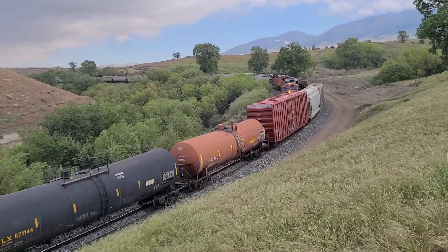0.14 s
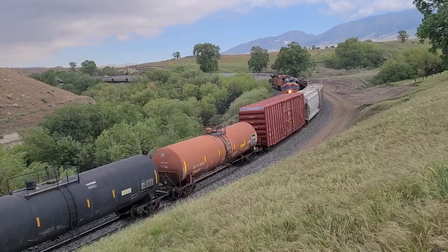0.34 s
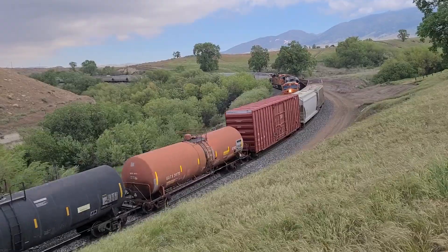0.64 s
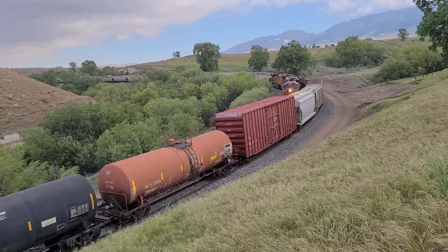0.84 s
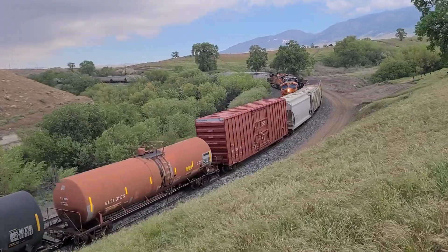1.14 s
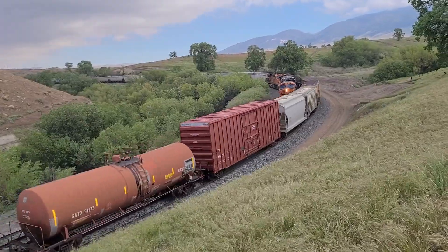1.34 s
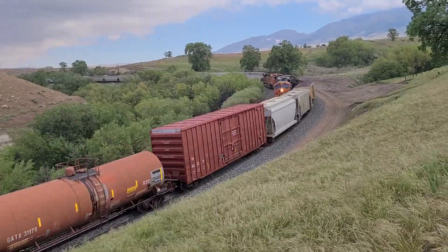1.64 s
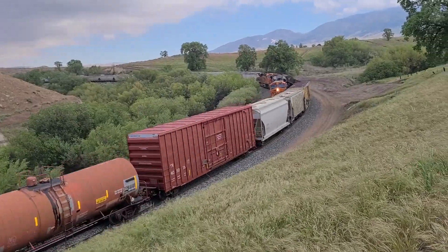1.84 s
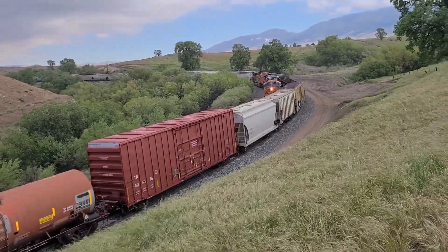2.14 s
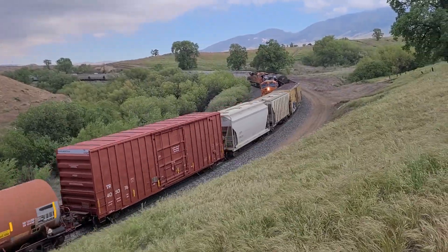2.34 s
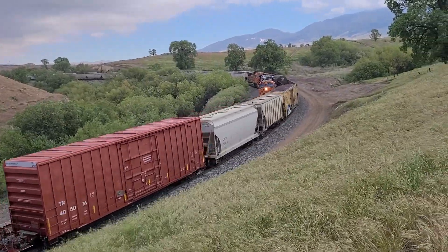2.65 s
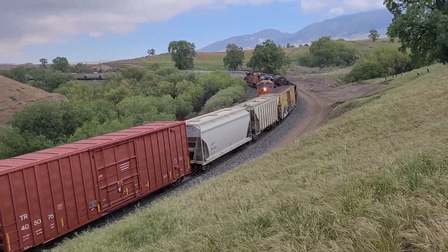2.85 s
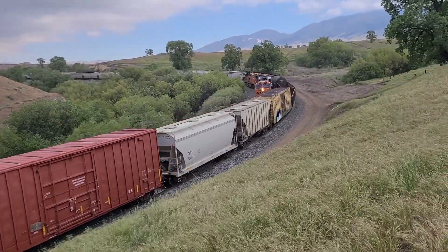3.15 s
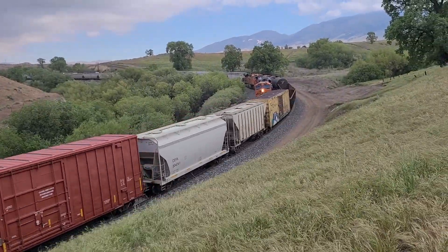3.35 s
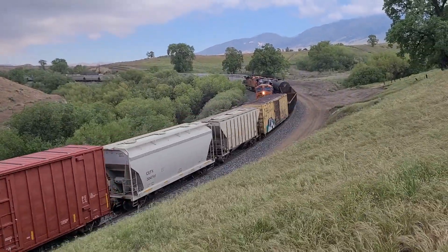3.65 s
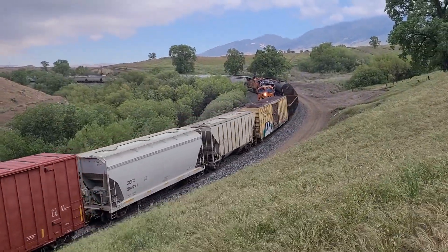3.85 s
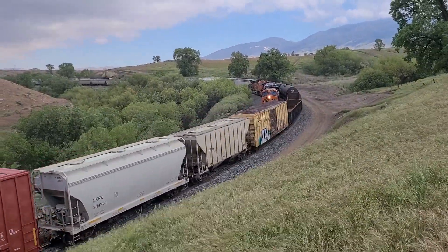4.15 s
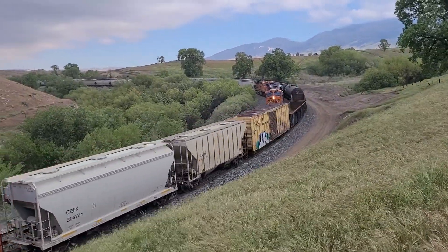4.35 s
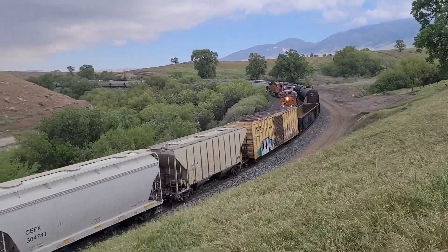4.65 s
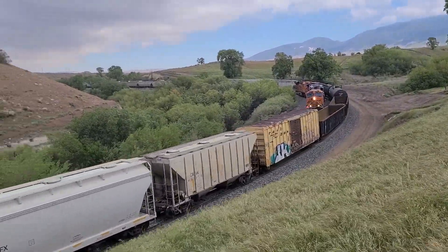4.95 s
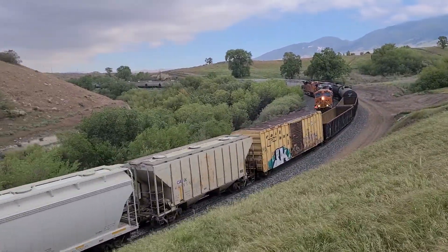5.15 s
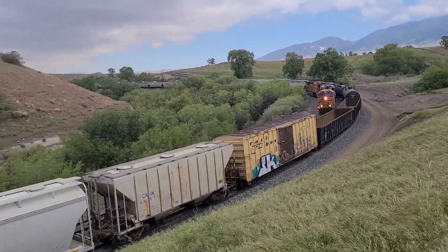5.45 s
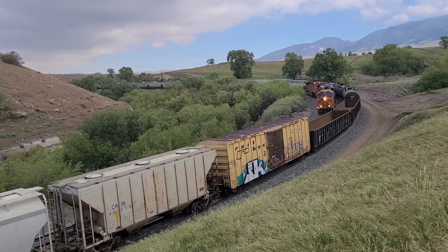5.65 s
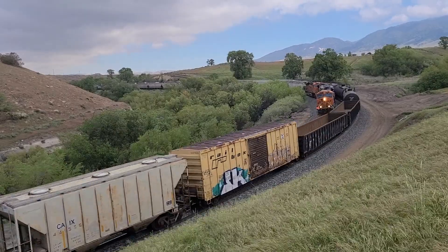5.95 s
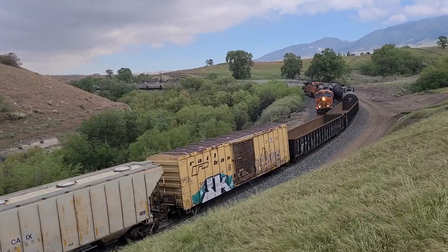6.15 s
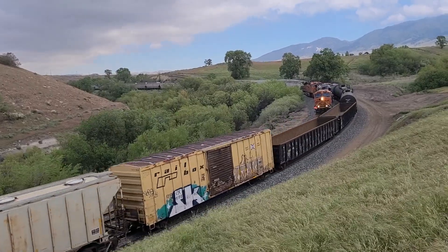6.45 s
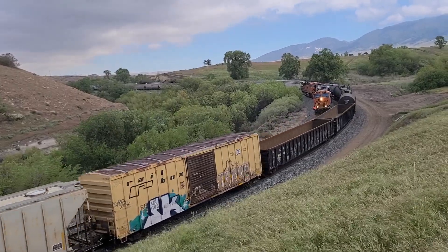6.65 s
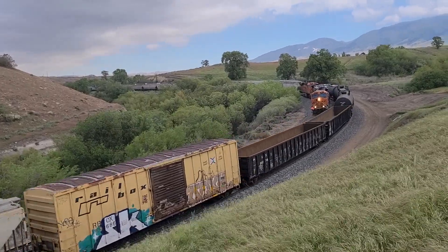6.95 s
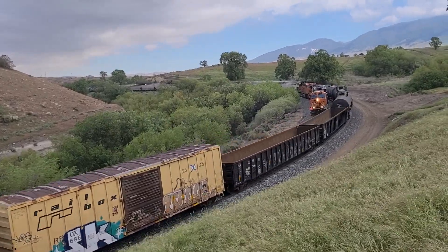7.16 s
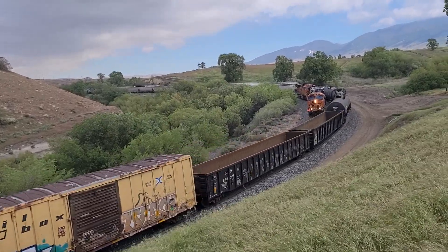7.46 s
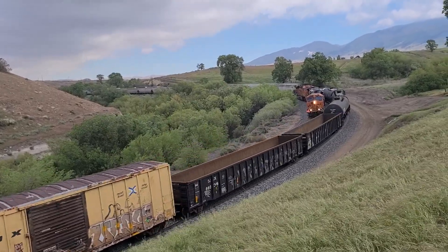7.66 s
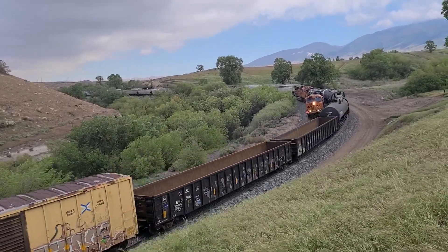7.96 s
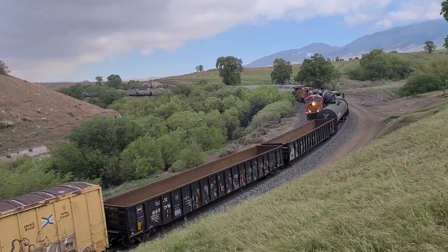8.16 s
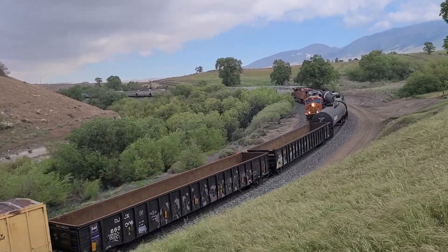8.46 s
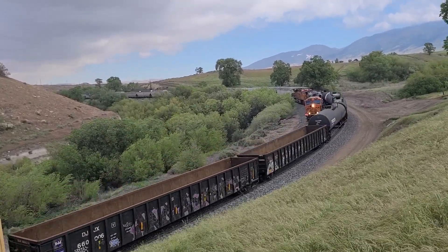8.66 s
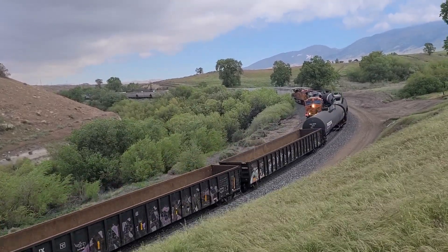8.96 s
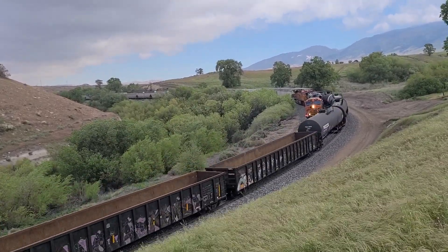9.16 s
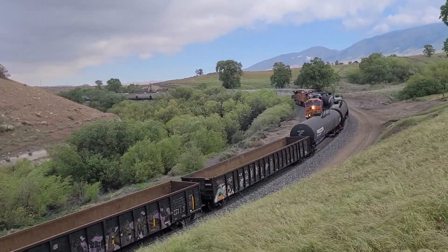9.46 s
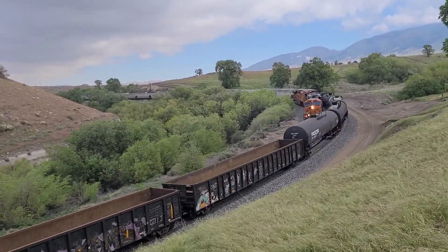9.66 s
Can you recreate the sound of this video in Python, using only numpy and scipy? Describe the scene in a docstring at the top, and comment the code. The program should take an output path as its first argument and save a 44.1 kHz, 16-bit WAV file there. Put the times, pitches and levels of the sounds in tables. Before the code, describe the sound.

High wavering wheel squeals, short yelps and a harsh shriek ride above hissing flanges and the low rumble of passing freight cars.

```python
"""First a high wheel whistle and a chatter are heard over a low rumble: a freight train in a tight curve.
Stick-slip across the rail locks wheels onto their own modes: wavering tones squeal, yelp and shriek.
Flange and tread friction, as noise shaped by resonances, grinds, hisses, rasps and roars.
Below, noise-driven cars rumble and boom, a body drones on one low tone and decaying knocks thump.
A grassy slope scatters a thin tail of the yelps, shrieks and bites back to the hillside."""
import sys
import numpy as np
from scipy import signal
from scipy.fft import irfft
from scipy.io import wavfile
from scipy.ndimage import uniform_filter1d

SR = 44100
rng = np.random.default_rng(int(sys.argv[2]) if len(sys.argv) > 2 else 0)


def master_out(mix):
    """Clip the mix to full scale and print it as 16-bit PCM to the path in sys.argv[1]."""
    frames = np.transpose(np.atleast_2d(mix))
    ceiling = np.clip(frames, -1, 1)
    pcm = np.round(ceiling * 32767).astype(np.int16)
    wavfile.write(sys.argv[1], SR, pcm)


N = 432180
TIME = np.arange(N) / SR  # s
FREQS = np.maximum(np.arange(N // 2 + 1) * SR / N, 1)  # Hz
TOP_HZ = 15750  # upper edge of the sound

# Levels of tones are those of the unscattered line.
# Main squeal held by slipping wheels:
# (start [s], length [s], pitch midway [Hz], level [dB], scattered share of amplitude [0-1])
SQUEALS = [(-.1, 1.5, 3570, -37, 0.55), (0.326, 0.33, 3546, -27, 0.3), (0.652, 0.24, 3565, -24, 0.52),
           (3.033, 0.26, 3615, -35, 0.6), (3.622, 0.46, 3610, -36.5, 0.65), (3.927, 1.41, 3608, -32, 0.58),
           (4.684, 0.28, 3620, -25, 0), (5.418, 0.34, 3600, -40, 0.63), (5.599, 0.35, 3600, -27.5, 0.25),
           (5.853, 0.37, 3607, -21, 0.21)]
SQUEAL_ATTACK_S, SQUEAL_RELEASE_S = 0.069, 0.15
SAG_PER_S = 0.0078  # share of its pitch that a passing wheel loses each second
STUTTER_DB, STUTTER_PER_S = 6, 55  # depth and rate of the uneven grip of a slipping wheel

# Sinking note of the last wheel: (time [s], pitch [Hz])
GLIDE = [(6.1, 3600), (7.25, 3556), (8.3, 3506), (9.8, 3454)]
# How loudly the last wheel slips: (time [s], level [dB])
SLIP = [(6.12, -37.5), (6.9, -36), (7.35, -28.5), (8.38, -28.5), (8.68, -42), (9.15, -31), (9.8, -37.5)]
# Moments when the last wheel locks onto a purer tone: (start [s], length [s], level [dB])
LOCKS = [(6.76, .05, -27), (7.04, .1, -31), (7.195, .055, -25.5), (7.585, .065, -19), (7.75, .13, -24),
         (8.132, 0.074, -19.5), (8.26, .17, -20.5), (8.435, .075, -22), (8.73, .27, -27), (9.21, .095, -22)]
LOCK_EDGE_S, CORE_SHARE = 0.013, 1.08  # attack of a lock; gain of the slip level in the firm core

# Spells of one wheel whistling in a higher mode: (start [s], length [s], level [dB])
WHISTLES = [(-.1, 0.44, -21.5), (.28, 0.21, -30.5), (0.448, 0.21, -26), (0.598, 0.37, -35.5),
            (0.903, 1.08, -44.5), (1.923, 0.32, -38)]
WHISTLE_HZ = 7140  # at time zero
# Spells of a wheel chattering without locking: (start [s], length [s], level [dB])
CHATTERS = [(-.1, 0.56, -27), (.39, 0.33, -25), (.72, .29, -24), (.95, 0.64, -34)]

# Short squeals of single wheels:
# (start [s], length [s], pitch midway [Hz], level [dB], octave relative to the tone [dB])
YELPS = [(0.026, 0.37, 10660, -36, -80), (0.869, 0.76, 1246, -31, -12), (0.845, 0.15, 12400, -32, -81),
         (1.531, 0.17, 2040, -24.5, -40), (1.599, 0.14, 1975, -28, -40), (2.024, 0.24, 1270, -35.5, -6),
         (2.533, 0.25, 1287, -28, -10), (2.65, 0.16, 13600, -31, -90), (2.729, 0.43, 994, -36, -23),
         (3.399, 0.092, 1285, -22.5, -12.5), (3.484, .065, 1270, -16, -20), (3.49, 0.28, 1283, -29.5, -24),
         (3.898, 0.6, 1284, -28.5, -18), (3.995, 0.13, 1267, -19, -18), (4.245, 0.083, 1260, -21, -13),
         (4.312, 0.085, 1265, -23, -21), (5.873, 0.022, 2440, -18, -22), (7.53, 0.366, 8620, -40.5, -80)]

# A flange jams and several modes shriek together:
# (start [s], length [s], level of the modes [dB], scrape before its attack and decay [dB])
SHRIEKS = [(5.226, 0.17, -18.5, -18), (5.814, .14, -28.5, -25.5)]
# Modes of a shriek, which take hold in turn: (frequency before bending [Hz], relative level [dB],
# begin [share of the shriek], end [share of the shriek], depth of beating [0-1])
SHRIEK_MODES = [(1253, 1, 0.12, 0.96, 0.074), (1880, 2, 0.181, 0.43, .1), (2460, -3, .06, 0.85, 0.97),
                (3040, -11, .3, 0.44, .6), (4810, -11, .5, 0.67, 0.27), (6910, -15.5, 0.29, 1, 0.51),
                (7940, -16, 0.48, 0.94, 0.47)]
# Spectrum of the gritty scrape: (frequency [Hz], relative density [dB per Hz])
SCRAPE = [(900, -22), (1450, -3), (1870, -4), (2450, -4), (3100, -5), (4400, -5), (10000, -14.5),
          (15500, -21)]
SCRAPE_ATTACK_S, SCRAPE_DECAY_S, SCRAPE_GRIT_DB = 0.034, 0.093, 1
BEND = 0.029  # share by which a mode sharpens between no flange pressure and full pressure
BEAT_HZ = 36.3  # a turning wheel splits a mode into a pair; the level beats at this rate

# A flange bites and the whole wheel rings:
# (start [s], length [s], ring level [dB], rasp level [dB], pitch of the leading mode [Hz])
BITES = [(2.1, 0.3, -25.5, -28, 6541), (2.543, 0.19, -22, -26, 5550), (2.698, 0.24, -22, -24, 6490),
         (3.08, 0.13, -29.5, -34, 2121), (6.999, 0.18, -34, -39, 9600), (7.476, 0.35, -38, -38, 4570),
         (8.22, 0.25, -34, -51, 4640)]
# Modes of an unworn wheel in a bite: (frequency [Hz], relative level [dB])
WHEEL = [(2121, 4), (4592, -1), (5550, 1), (6498, -1.5), (7456, -1), (8344, 0), (9405, -2), (13150, 2)]
LEAD_DB = 5.5  # the leading mode is raised above its place in the wheel table

# Flanges pressing on the rail: (time [s], hiss before its gain [dB], grinding before its gain [dB])
FLANGES = [(0.0, -31, -32.5), (0.33, -30.5, -30.5), (1.79, -27.5, -25), (1.91, -30.5, -33),
           (2.76, -30.5, -30), (3.19, -30, -32), (3.79, -31.5, -31.5), (4.23, -32, -33.5),
           (5.19, -32.5, -30.5), (5.4, -36.5, -40), (7.45, -35.5, -32), (8.46, -38.5, -37.5),
           (9.01, -34, -33), (9.5, -38.5, -33), (9.8, -38, -32)]
HISS_GAIN_DB, GRIND_GAIN_DB = 7, 1
# Wheel and rail resonances under steady grinding:
# (frequency [Hz], offset at half amplitude [Hz], relative level [dB])
GRIND = [(1217, 59, 1.5), (1942, 185, 5.5), (2080, 354, 8.5), (2540, 180, -16), (4586, 170, 4)]
# Spectrum of the flange hiss: (frequency [Hz], relative density [dB per Hz])
HISS = [(1500, -10), (2550, 7), (2850, 1), (3300, 6), (4800, 5), (7000, 4.5), (7900, -1), (9300, 3.5),
        (11400, 1.5), (13200, 4.5), (15500, 0)]
# Sideways lean of the hiss: (frequency [Hz], left minus right [dB])
HISS_PAN = [(1500, -6.5), (3000, 4.5), (5200, -0.5), (8000, 10), (9800, 0.5), (13000, 5.5), (15500, 2)]
# Spectrum of the tread roar: (frequency [Hz], relative density [dB per Hz])
TREAD = [(350, -10.5), (620, -4.5), (1050, 8), (1400, 3), (1650, -4), (5000, -30)]
TREAD_DB = -34  # the even roar
# a rough set of wheels builds up and is suddenly past
ROUGH_FROM_S, ROUGH_TO_S, ROUGH_RELEASE_S, ROUGH_GAIN_DB = 2.46, 5.24, 0.17, 9

# A dry flange skims the rail: (start [s], length [s], level [dB])
SKIMS = [(2.6, 0.99, -29.5), (4.06, 0.2, -28), (6.05, 0.46, -30.5), (6.4, 1, -39.5)]
SKIM_HZ, SKIM_WIDTH_HZ = 12600, 4000

# Groups of cars, each with its own sound once alongside: (time [s], rumble [dB], running gear [dB])
CARS = [(0, -20.5, -25.5), (.85, -19, -25), (1.94, -29.5, -30), (2.48, -23.5, -30), (3.72, -17.5, -29),
        (4.6, -18, -26), (5.45, -18.5, -27), (8.05, -20, -27.5), (8.92, -16.5, -25.5)]
HANDOVER_S = 0.14  # one group gives way to the next
# Spectrum of the car rumble: (frequency [Hz], relative density [dB per Hz])
RUMBLE = [(20, -29), (50, -3.5), (63, 3), (80, 1.5), (100, -0.5), (125, -9.5), (170, -18.5), (300, -47)]
# Spectrum of the running gear: (frequency [Hz], relative density [dB per Hz])
GEAR = [(90, -11.5), (150, -1.5), (200, 1.5), (400, -5.5), (520, -12), (800, -16.5), (2000, -44)]
# one hollow body drones, louder as it nears and softer as it leaves
DRONE_HZ, DRONE_DB, DRONE_PASSES_S = 63.55, -14, 6.2
DRONE_RISE_DB_S, DRONE_FALL_DB_S = 6.5, 4

# Empty cars boom as they pass: (start [s], length [s], pitch [Hz], level [dB])
BOOMS = [(0.692, 1.22, 94.7, -19.5), (8.202, 1.8, 134, -30)]
# Slack and springs knock: (start [s], level before attack and decay [dB])
THUMPS = [(1.861, -12), (3.774, -3), (4.148, -8), (4.781, -5.5)]
THUMP_ATTACK_S, CLANK_SHARE, CLANK_DECAY_S = 0.006, 0.3, 0.025

ROLL_LAG_S, RUB_LAG_S = 0.00025, 0.00056  # how much later the right microphone hears each


def undb(db):
    """Amplitude ratio: decibels become gain."""
    return 10 ** (np.asarray(db) / 20)


def unit(x):
    """Normalisation of power: scale to rms 1."""
    return x / np.sqrt(np.mean(np.abs(x) ** 2))


def curves(table):
    """Linear interpolation: the columns of a table joined by straight lines in time."""
    s, *columns = np.transpose(table)
    return [np.interp(TIME, s, c) for c in columns]


def colour(points):
    """Spectral shaping: gain from (Hz, dB) points, straight in dB over log frequency."""
    hz, db = np.transpose(points)
    return undb(np.interp(np.log(FREQS), np.log(hz), db))


def resonance(hz, width_hz):
    """Resonance: a gain peak that falls to half amplitude at width_hz on either side."""
    return 1 / (1 + ((FREQS - hz) / width_hz) ** 2)


def flutter(rate, size=N):
    """Random modulation: complex knots of unit mean power, rate times a second, smoothly joined."""
    step = max(int(SR / rate), 1)
    knots = rng.standard_normal((size // step + 2, 2)) @ np.array([1, 1j]) / np.sqrt(2)
    ease = (1 - np.cos(np.pi * np.arange(step) / step)) / 2
    smooth = knots[:-1, None] + np.diff(knots)[:, None] * ease
    return smooth.ravel()[:size]


def pan(db):
    """Level stereophony: left and right gains for a left-minus-right difference."""
    return undb(np.array([[db], [-db]]) / 2)


def noise(gain, likeness):
    """Partial coherence: shaped stereo noise of rms 1 whose sides share some of their power."""
    shared, left, right = rng.standard_normal((3, 2 * len(FREQS))).view(complex)
    c = np.clip(likeness, 0, 1)
    spectrum = np.sqrt(c) * shared + np.sqrt(1 - c) * np.array([left, right])
    return unit(irfft(spectrum * gain, N))


def swell(t, length, edge):
    """Contact envelope: it builds up, holds and lets go; edge is the share of each flank."""
    return np.sin(np.pi / 2 * np.clip(np.minimum(t, length - t) / (edge * length), 0, 1)) ** 2


def held(t, length, attack_s, release_s):
    """Contact envelope: it takes hold, stays and lets go in set times."""
    return np.sin(np.pi / 2 * np.clip(np.minimum(t / attack_s, (length - t) / release_s), 0, 1)) ** 2


def spell(start, length):
    """Local time: time since a contact began, over the part of it that is heard."""
    return TIME[max(int(start * SR), 0):int((start + length) * SR)] - start


def add(out, start, x):
    """Superposition: mix a sound in at its time."""
    i = max(int(start * SR), 0)
    out[:, i:i + x.shape[-1]] += x[..., :N - i]


def sing(hz, scatter, jitter_hz, smear_hz):
    """Stick-slip: a held mode is a wavering line, smeared by slip noise and paths off the moving cars."""
    size = len(hz)
    wavering_hz = hz + jitter_hz * flutter(45.5, size=size).real
    phase = 2 * np.pi * np.cumsum(wavering_hz) / SR
    shared, left, right = (0.74 * flutter(smear_hz, size=size) + 0.85 * flutter(3.6 * smear_hz, size=size)
                           for _ in range(3))
    direct = np.exp(.5j * np.array([[0.], [-1.6]]))  # the straight path meets the two microphones out of step
    paths = shared * direct + 1.39 * np.array([left, right])
    share = np.clip(scatter, 0, 1)
    envelope = np.sqrt(1 - share ** 2) * direct + share * paths
    return np.sqrt(2) * (envelope * np.exp(1j * phase)).real


def long_squeals():
    """Stick-slip self-excitation: wheel after wheel holds a note that sinks as the wheel goes by."""
    out = np.zeros((2, N))
    for start, length, pitch, db, scatter in SQUEALS:
        t = spell(start, length)
        hz = pitch * (1 - SAG_PER_S * (t - length / 2))
        squeal = sing(hz, scatter, jitter_hz=5.6, smear_hz=84.4)
        overtones = undb(-24.0) * sum(sing(k * hz, scatter, jitter_hz=20.0, smear_hz=108.0) for k in (2, 3))
        # a locked wheel sings evenly, a slipping one stutters
        grip = undb(STUTTER_DB * scatter * flutter(STUTTER_PER_S, size=len(t)).real)
        contact = held(t, length, SQUEAL_ATTACK_S, SQUEAL_RELEASE_S)
        # rough slipping brings out the overtones
        add(out, start, (squeal + scatter * overtones) * grip * undb(db) * contact)
    return out * pan(5.1)


def last_wheel():
    """Frequency locking: a smeared halo while the wheel slips, a firm core that swells when it locks."""
    (hz,), (slip_db,) = curves(GLIDE), curves(SLIP)
    onset = np.clip((TIME - SLIP[0][0]) / SQUEAL_ATTACK_S, 0, 1)
    slip = undb(slip_db + 3.85 * flutter(STUTTER_PER_S).real) * onset
    overtones = sum(sing(k * hz, 1, jitter_hz=20.0, smear_hz=105.0) for k in (2, 3))
    halo = sing(hz, 0.99, jitter_hz=4.0, smear_hz=70.0) + undb(-19) * overtones
    lock = sum(undb(db) * held(TIME - start, length, LOCK_EDGE_S, 2 * LOCK_EDGE_S)
               for start, length, db in LOCKS)
    core = sing(hz, 0.18, jitter_hz=5.0, smear_hz=80.0) * (lock + CORE_SHARE * slip)
    return (halo * slip + core) * pan(5.5)


def high_wheels():
    """Higher-mode excitation: one wheel whistles on a line; another chatters as narrow-band noise."""
    grip, chatter = (sum(undb(db) * held(TIME - start, length, attack_s=0.065, release_s=0.11)
                         for start, length, db in spells) for spells in (WHISTLES, CHATTERS))
    hz = WHISTLE_HZ * (1 - SAG_PER_S * TIME)
    whistle = sing(hz, 0.25, jitter_hz=11.5, smear_hz=80.5) * grip * pan(14.5)
    return whistle + noise(resonance(4320, 52), 0.14) * chatter * pan(-2.5)


def yelps():
    """Brief mode locking: a wheel sings for a moment, with a rough octave where that fits below the top."""
    out = np.zeros((2, N))
    for start, length, hz, db, octave_db in YELPS:
        t = TIME[:int(length * SR)]
        pitch = hz * (1 - 0.016 * (t - length / 2))  # the wheel is passing, so its note sinks
        waver_hz = 45 * np.sqrt(undb(db))  # light contact sings steadily, hard slip wavers
        tone = sing(pitch, 0.4, jitter_hz=waver_hz, smear_hz=65.4)
        if 2 * hz < TOP_HZ:
            tone += undb(octave_db) * sing(2 * pitch, 0.81, jitter_hz=24.6, smear_hz=82.0)
        lean_db = -4.5 if hz < 2200 else 4  # low notes lean right, high ones left
        add(out, start, tone * swell(t, length, edge=0.2) * undb(db) * pan(lean_db))
    return out


def shrieks():
    """Multimode excitation: a jammed flange scrapes, modes join in turn and bend, split pairs beat."""
    out = np.zeros((2, N))
    scrape = noise(colour(SCRAPE), 0.24)
    grit = unit(scrape * undb(SCRAPE_GRIT_DB * flutter(300).real))
    for start, length, db, scrape_db in SHRIEKS:
        t, i = TIME[:int(length * SR)], int(start * SR)
        decay = np.exp(-np.maximum(t - SCRAPE_ATTACK_S, 0) / SCRAPE_DECAY_S)
        slip = held(t, length, SCRAPE_ATTACK_S, release_s=0.017) * decay
        add(out, start, grit[:, i:i + len(t)] * slip * undb(scrape_db))
        for hz, mode_db, begins, ends, beat in SHRIEK_MODES:
            span = length * max(ends - begins, .1)
            t = TIME[:int(span * SR)]
            press = np.sin(np.pi * (begins + t / length))  # hardest midway through the shriek
            bent_hz = hz * (1 + BEND * (press - np.pi / 4))
            beating = 1 - beat * np.cos(2 * np.pi * BEAT_HZ * t)
            tone = sing(bent_hz, 0.11, jitter_hz=12.0, smear_hz=89.7) * beating
            lean_db = -4.5 if hz < 2200 else 4  # low notes lean right, high ones left
            level = undb(db + mode_db) * pan(lean_db)
            add(out, start + begins * length, tone * swell(t, span, edge=0.16) * level)
    return out


def bites():
    """Modal response: hard flange contact rasps and rings many wheel modes, each wavering alone."""
    spectrum = colour([(700, -38), (1300, 5), (2900, 8), (4700, 1.0), (7000, -14.0), (11000, -9), (15500, -38)])
    # the contact point wanders, so the rasp moves from mode to mode
    rasp = unit(sum(undb(5.8 * flutter(14).real) * noise(spectrum * resonance(hz, hz / 3), 0.05)
                    for hz, _ in WHEEL))
    out = np.zeros((2, N))
    for start, length, ring_db, rasp_db, lead_hz in BITES:
        t, i = TIME[:int(length * SR)], int(start * SR)
        lead = min((hz for hz, _ in WHEEL), key=lambda hz: abs(hz - lead_hz))
        wear = lead_hz / lead  # no two wheels are worn alike
        ring = unit(sum(undb(db + LEAD_DB * (hz == lead) + 7.3 * flutter(17.7, size=len(t)).real)
                        * sing(np.full(len(t), hz * wear), 0.65, jitter_hz=22.0, smear_hz=110.1)
                        for hz, db in WHEEL))
        contact = undb(ring_db) * ring + undb(rasp_db) * rasp[:, i:i + len(t)]
        add(out, start, contact * swell(t, length, edge=0.26))
    return out * pan(1.5)


def rubbing():
    """Friction noise: treads roar, flanges grind in the wheel and rail resonances and hiss broadly."""
    hiss_db, grind_db = curves(FLANGES)
    rough = np.interp(TIME, [ROUGH_FROM_S, ROUGH_TO_S, ROUGH_TO_S + ROUGH_RELEASE_S], [0, 1, 0])
    tread_db = TREAD_DB + ROUGH_GAIN_DB * rough + 3.07 * flutter(11).real
    tread = noise(colour(TREAD), 0.27) * undb(tread_db) * pan(-3.5)
    modes = sum(undb(db + 4.8 * flutter(24).real) * noise(resonance(hz, width), 0.29)
                for hz, width, db in GRIND)
    grind = unit(modes) * undb(grind_db + GRIND_GAIN_DB) * pan(-6.5)
    lean = np.sqrt(colour(HISS_PAN))
    spectrum = colour(HISS) * np.array([lean, 1 / lean])
    # the low and the high hiss come from different wheels and waver apart
    top = 1 / (1 + (8000 / FREQS) ** 6)  # power share of the high hiss
    hiss = 0
    for part in (top, 1 - top):
        band_rms = np.sqrt(np.mean(spectrum ** 2 * part))
        hiss = hiss + undb(2.3 * flutter(20).real) * band_rms * noise(spectrum * np.sqrt(part), 0.094)
    return tread + grind + unit(hiss) * undb(hiss_db + HISS_GAIN_DB)


def skims():
    """Light friction: a dry flange makes a thin hiss in one broad, very high resonance."""
    touch = sum(undb(db) * swell(TIME - start, length, edge=0.32) for start, length, db in SKIMS)
    return noise(resonance(SKIM_HZ, SKIM_WIDTH_HZ), 0.13) * touch * pan(4.4)


def rolling():
    """Rolling noise and body resonance: cars rumble, running gear rattles, a hollow body drones past."""
    arrives, *levels = np.transpose(CARS)
    alongside = np.searchsorted(arrives[1:], TIME)
    rumble_db, gear_db = (uniform_filter1d(db[alongside], int(HANDOVER_S * SR)) for db in levels)
    rumble = noise(colour(RUMBLE), 0.92) * undb(rumble_db + 3.0 * flutter(9).real)
    gear = noise(colour(GEAR), 0.95) * undb(gear_db + 2.6 * flutter(22).real)
    body = np.sqrt(2) * ((1 + 0.5 * flutter(18)) * np.exp(2j * np.pi * DRONE_HZ * TIME)).real
    since = TIME - DRONE_PASSES_S
    drone_db = DRONE_DB + np.minimum(DRONE_RISE_DB_S * since, -DRONE_FALL_DB_S * since)
    return (rumble + gear + body * undb(drone_db)) * pan(-1.05)


def booms():
    """Forced resonance: track roughness excites the broad body resonance of an empty car."""
    out = np.zeros((2, N))
    for start, length, hz, db in BOOMS:
        out += noise(resonance(hz, hz / 10), 0.93) * swell(TIME - start, length, edge=0.068) * undb(db)
    return out


def thumps():
    """Damped impact: a knock booms briefly in the car body, with a dull clank of the running gear."""
    out, t = np.zeros((2, N)), TIME[:SR // 3]
    clank = noise(colour([(100, -10), (200, 13), (420, 13), (900, -36.0), (3000, -36), (8000, -60)]), 0.28)
    for start, db in THUMPS:
        boom = np.sin(2 * np.pi * 76 * t) * np.exp(-t / 0.035)
        i = int(start * SR)
        rattle = CLANK_SHARE * clank[:, i:i + len(t)] * np.exp(-t / CLANK_DECAY_S)
        add(out, start, undb(db) * (boom + rattle) * (1 - np.exp(-t / THUMP_ATTACK_S)))
    return out


def from_left(x, lag_s):
    """Time-difference stereophony: a sound from the left reaches the right microphone a little later."""
    return np.array([x[0], np.roll(x[1], int(lag_s * SR))])


def hillside(x, t60_s, wet_db):
    """Diffuse scattering: the slope and the car sides return a thin tail of decaying noise."""
    t = TIME[:SR]
    tail = rng.standard_normal((2, len(t))) * undb(-60 * t / t60_s) * (t > .02)
    tail /= np.sqrt(np.sum(tail ** 2, axis=1, keepdims=True))  # unit energy on each side
    return x + undb(wet_db) * signal.fftconvolve(x, tail, axes=1)[:, :N]


def scene():
    """Superposition: wheels sing over rolling and rubbing from the left, and the slope answers some."""
    squeals = long_squeals() + last_wheel() + high_wheels()
    outbursts = hillside(yelps() + shrieks() + bites(), t60_s=0.24, wet_db=-7)
    friction = from_left(rubbing() + skims(), RUB_LAG_S)
    cars = from_left(rolling() + booms() + thumps(), ROLL_LAG_S)
    return squeals + outbursts + friction + cars


def record(dry):
    """Band limiting: the recorder clips at full scale, then a steep low-pass cuts the top."""
    low_pass = signal.ellip(10, .2, 80, TOP_HZ, fs=SR, output="sos")
    return signal.sosfilt(low_pass, np.clip(dry, -1, 1))


dry = scene()
out = record(dry)
master_out(out)
```